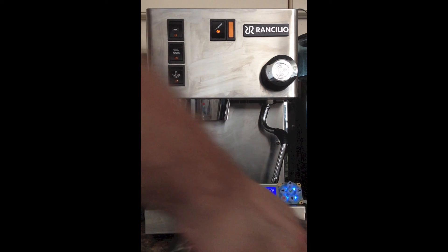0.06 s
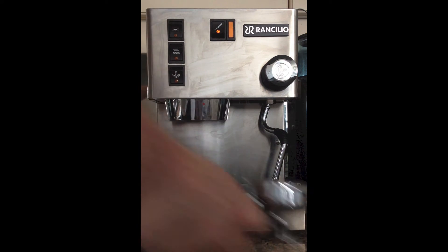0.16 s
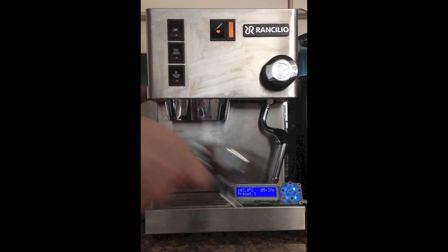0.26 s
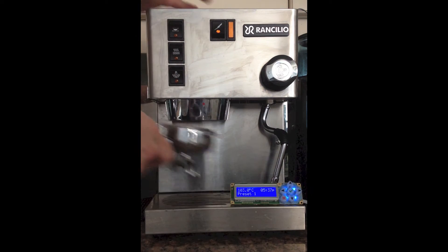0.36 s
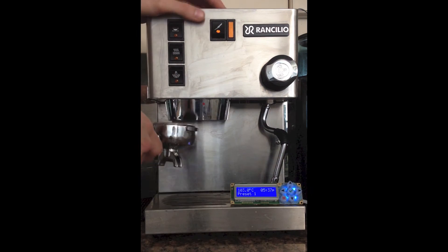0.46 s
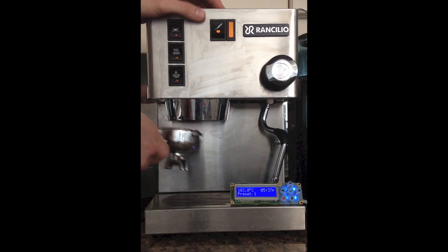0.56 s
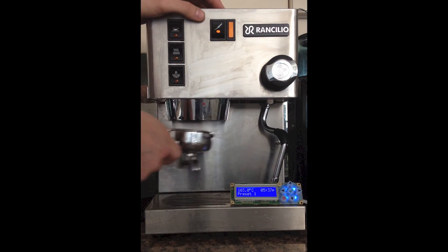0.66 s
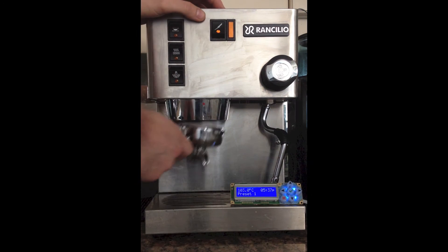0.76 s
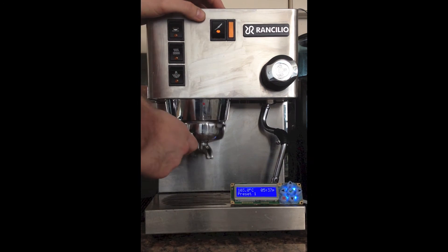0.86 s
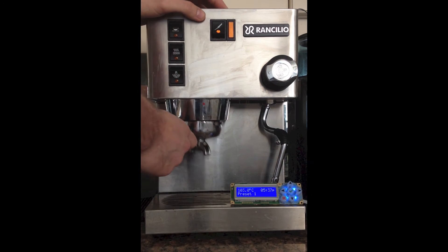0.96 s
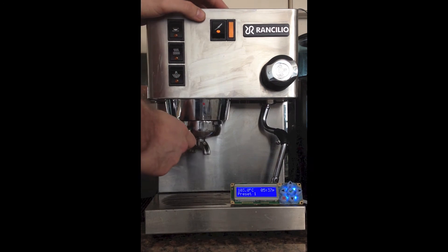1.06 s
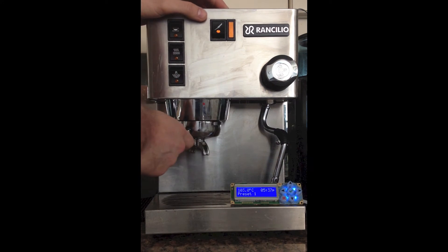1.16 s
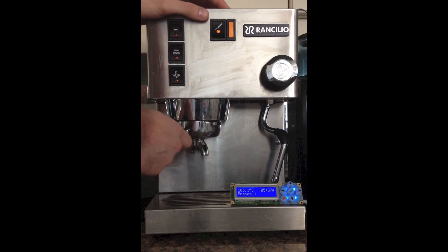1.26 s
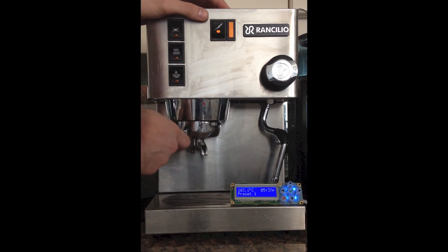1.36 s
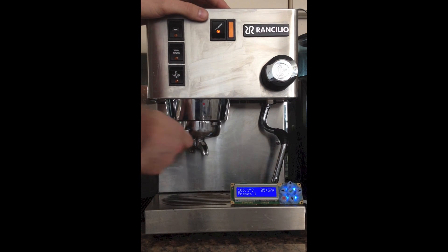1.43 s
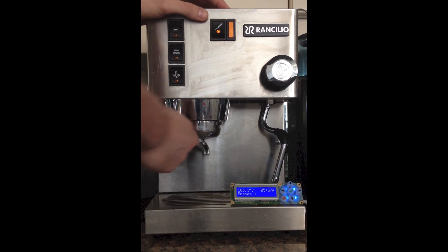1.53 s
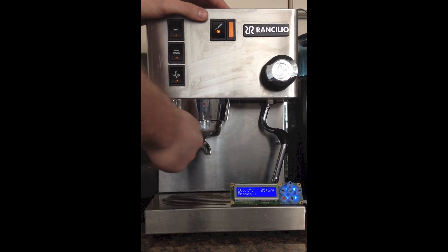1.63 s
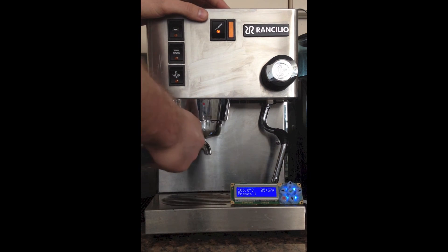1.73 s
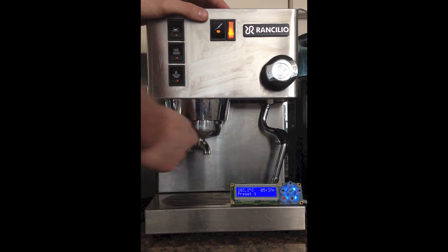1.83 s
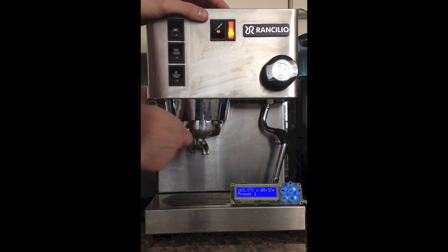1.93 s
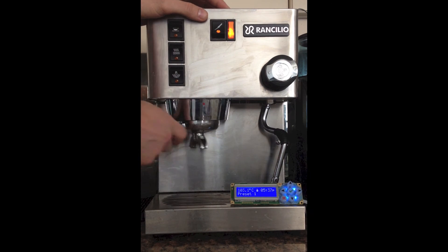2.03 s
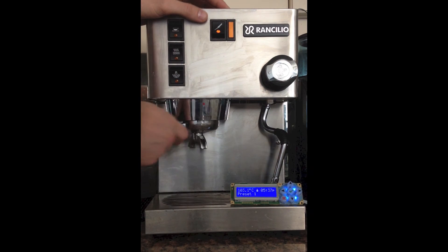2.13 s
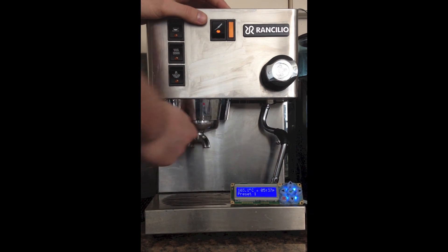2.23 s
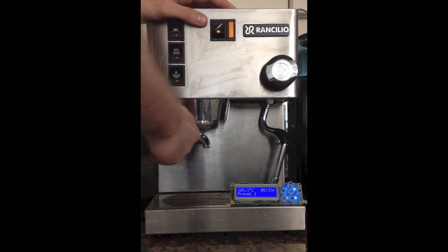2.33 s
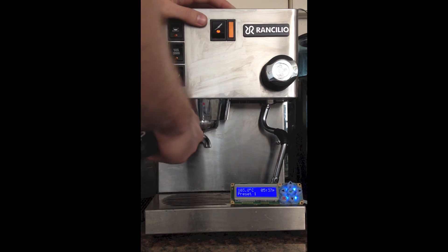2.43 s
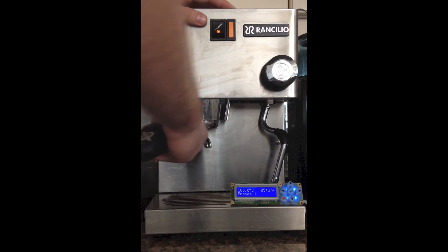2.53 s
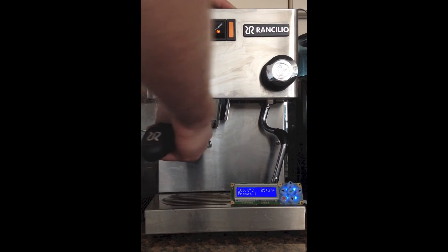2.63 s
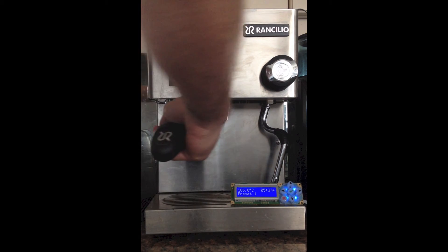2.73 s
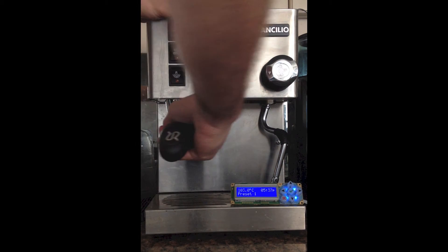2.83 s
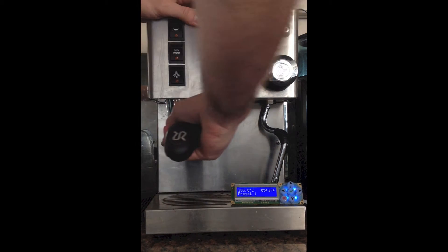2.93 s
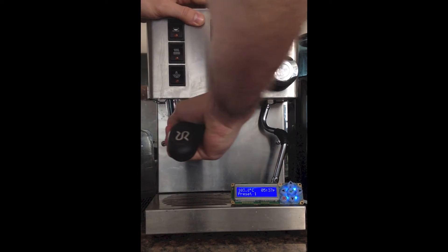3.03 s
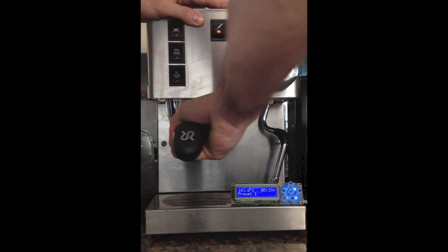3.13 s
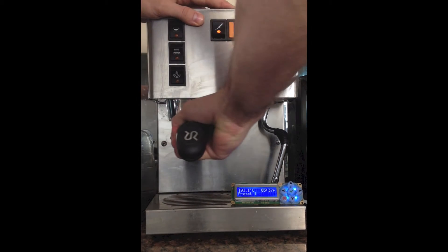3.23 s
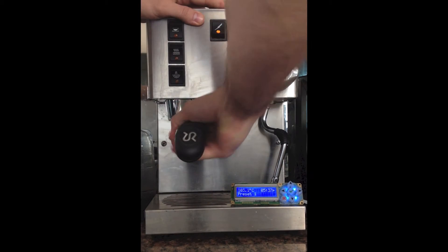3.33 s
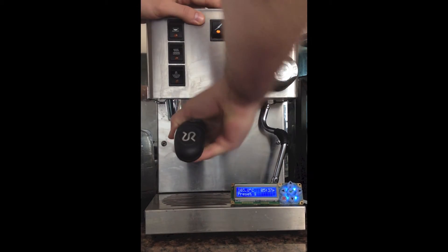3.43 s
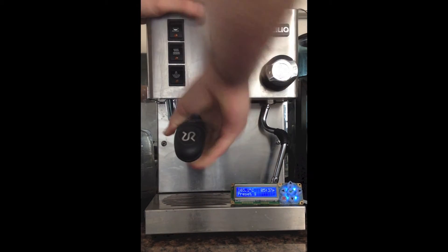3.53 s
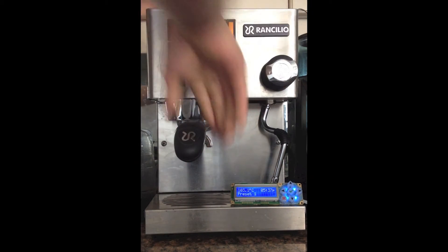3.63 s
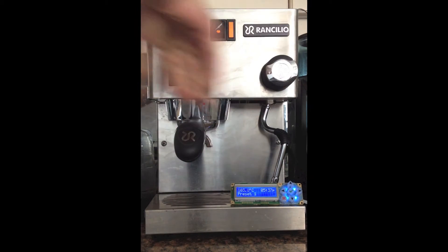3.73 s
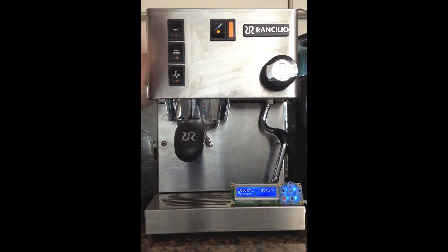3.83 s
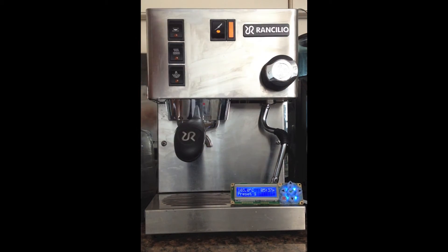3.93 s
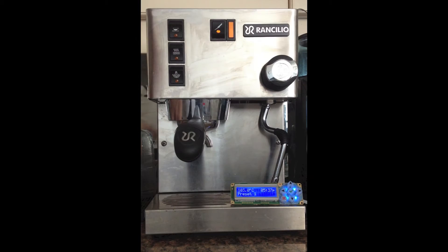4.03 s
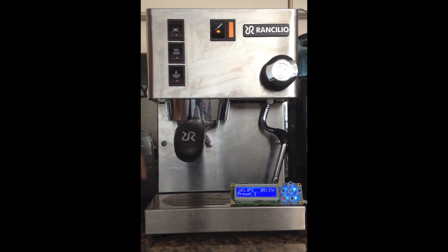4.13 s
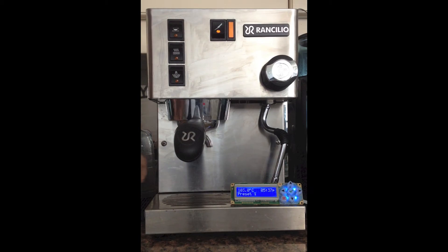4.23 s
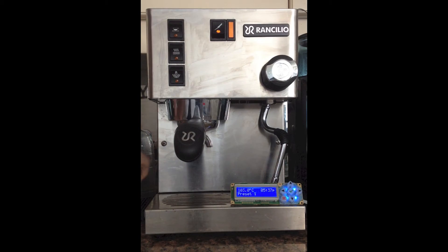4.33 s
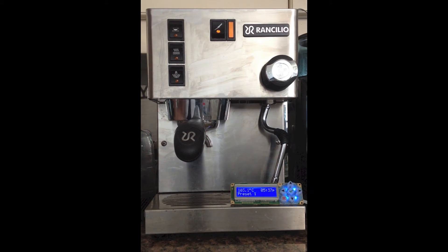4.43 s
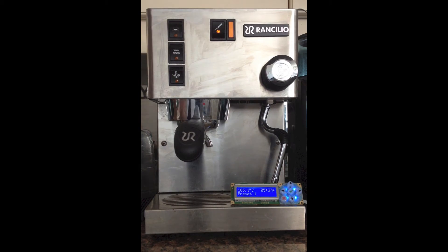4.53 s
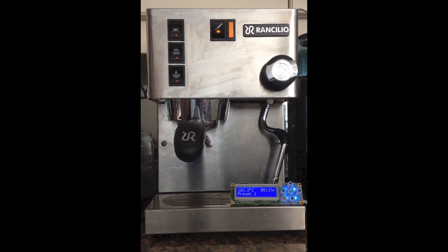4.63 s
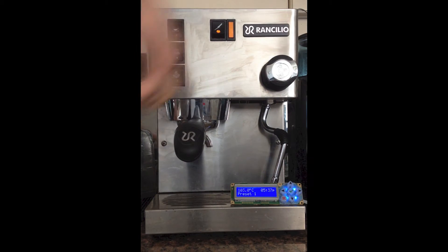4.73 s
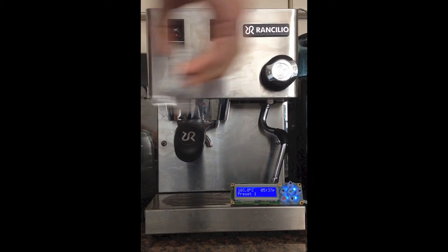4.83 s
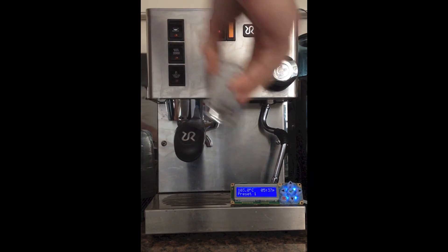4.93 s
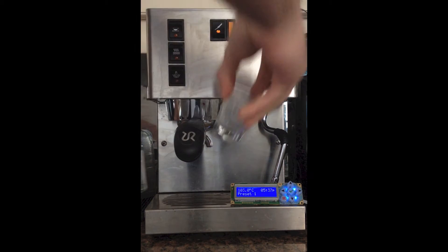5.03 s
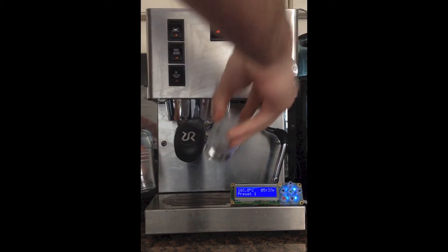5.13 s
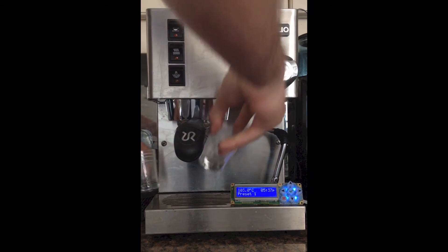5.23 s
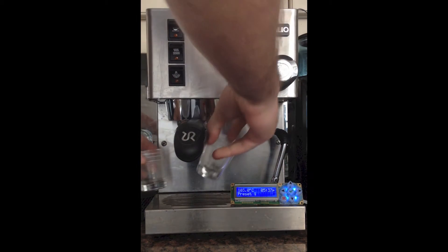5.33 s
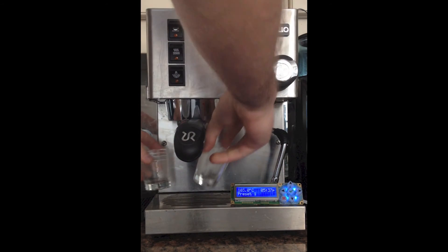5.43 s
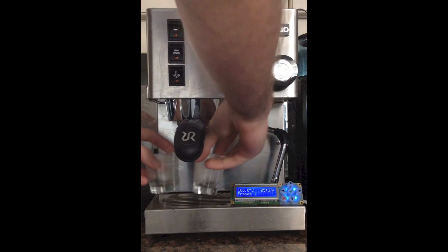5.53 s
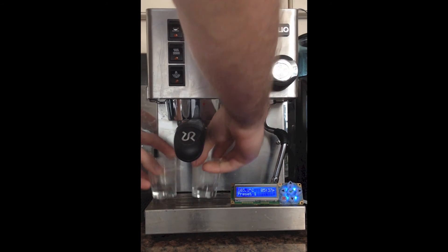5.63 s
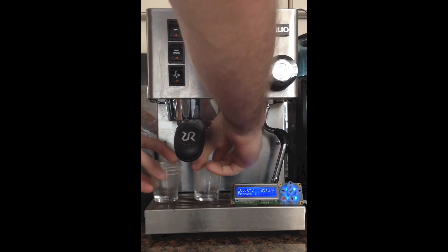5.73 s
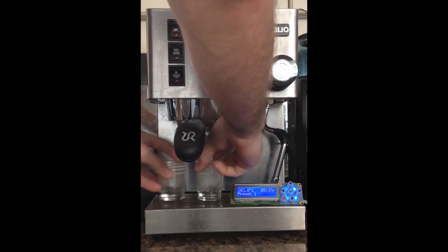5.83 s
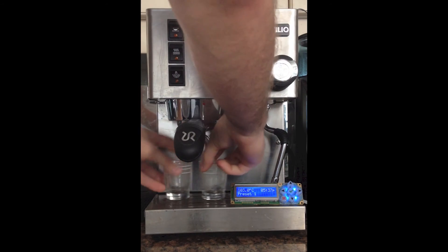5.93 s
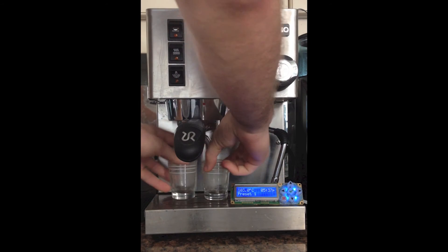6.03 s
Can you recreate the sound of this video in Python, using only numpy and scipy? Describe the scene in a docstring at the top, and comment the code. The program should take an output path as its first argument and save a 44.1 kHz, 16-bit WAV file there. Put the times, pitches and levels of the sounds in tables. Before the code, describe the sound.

A low, noisy hum with faint hiss runs throughout a reflective kitchen, heard close through a small microphone with thin bass. At 0 s a loose metal basket rings around a mid pitch and dies within a quarter second; a light metal tap follows at 0.47. From 0.82 to 1.02 a heavy metal holder knocks and scrapes against a steel housing, ringing briefly. Small taps and a short slide come at 1.46 to 1.63, a faint scrape near 1.8. The loudest clanks and a rough grating slide fall at 1.97 to 2.2. At 3.3 there is a dull thud with a quick, falling rubbery squeak that trails into a weak whine. Faint touches follow at 3.6 to 4.4, and barely audible squeaky rubs at 4.9 and 5.1. At 5.73 glass hits the steel tray with a bright, rapid clatter and ring, then soft nudges and small clinks until about 6.03.

```python
"""Portafilter and glasses

A portafilter is knocked into the group head of an espresso machine, seated and twisted until it squeaks
tight; then glasses land on the steel drip tray. A low hum fills the hard-walled kitchen.
Blows ring tuned modes and shaped noise, slides are trains of tiny slips, squeaks are gliding harmonics.
Basket, taps and hum are filtered noise; decaying noise gives the room."""
import sys
import numpy as np
from scipy import signal
from scipy.io import wavfile
from scipy.ndimage import uniform_filter1d

SR = 44100
rng = np.random.default_rng(int(sys.argv[2]) if len(sys.argv) > 2 else 0)


def put_to_file(sound):
    """Save the sound as 16-bit audio at rate SR, in the file named by the first command-line argument."""
    columns = np.atleast_2d(sound).T  # one column per channel
    safe = np.clip(columns, -1, 1)
    whole_steps = np.round(safe * 32767)
    wavfile.write(sys.argv[1], SR, whole_steps.astype(np.int16))


N = 268216
TIME = np.arange(N) / SR
EDGES_HZ = np.geomspace(28, 17000, 27)
CENTRES_HZ = np.sqrt(EDGES_HZ[1:] * EDGES_HZ[:-1])


def from_db(db):
    """Decibels to gain."""
    return 10 ** (np.asarray(db) / 20)


def rms_one(x):
    """Scale to rms 1."""
    return x / np.sqrt(np.mean(x ** 2) + 1e-20)


def at_hz(points, hz):
    """Read a table on a log-frequency axis."""
    points = np.array(points)
    return np.interp(np.log(hz), np.log(points[:, 0]), points[:, 1])


def band_pass(x, edges_hz):
    """Keep what lies between two frequencies."""
    return signal.sosfilt(signal.butter(2, edges_hz, "band", fs=SR, output="sos"), x)


def split(sources):
    """Bands of about a third octave, each rms 1, dealt in turn from two sources."""
    return [rms_one(band_pass(sources[k % 2], EDGES_HZ[k:k + 2])) for k in range(len(CENTRES_HZ))]


def shares(spectrum):
    """Band gains of a spectrum, with total power 1."""
    gains = from_db(at_hz(spectrum, CENTRES_HZ)) * np.sqrt(np.diff(EDGES_HZ))
    return gains / np.linalg.norm(gains)


def tone_db(hz, bass_db, treble_db_per_oct):
    """Heavy contacts lift the bass; hardness tilts the treble."""
    bass = bass_db / (1 + (hz / 550) ** 4)
    treble = treble_db_per_oct * np.log2(1 + (hz / 1700) ** 2) / 2
    return bass + treble


def narrow_noise(hz, width_hz):
    """Noise through one resonance, rms 1."""
    edges_hz = hz * np.exp(np.array([-.5, .5]) * width_hz / hz)
    settled = band_pass(rng.standard_normal(SR + N), edges_hz)[SR:]
    return rms_one(settled)


def dying(start_s, level_db, t60_s):
    """A sudden start and an exponential decay, floored 120 dB down."""
    return (TIME >= start_s) * from_db(level_db - 60 * np.clip((TIME - start_s) / t60_s, 0, 2))


def stroke(start_s, length_s, attack_s, release_t60_s):
    """Pressure builds, holds until the end of the stroke and is let go."""
    rise = np.clip((TIME - start_s) / attack_s, 0, 1) ** 2
    release_db = -60 * np.clip((TIME - start_s - length_s) / release_t60_s, 0, 3)
    return rise * from_db(release_db)


def clicks(times_s, heights):
    """One impulse for each contact."""
    out = np.full(N, 1e-18)
    places = np.clip(np.round(np.asarray(times_s) * SR).astype(int), 0, N - 1)
    np.add.at(out, places, heights)
    return out


def with_rebounds(rows, gap_s, loss_db, bass_gain_db):
    """Columns of all contacts: each blow, then its evenly spaced, ever weaker rebounds."""
    contacts = []
    for start_s, level_db, bass_db, *colour, rebounds in rows:
        for k in range(1 + max(round(rebounds), 0)):
            contacts.append((start_s + k * gap_s, level_db - k * loss_db, bass_db + k * bass_gain_db, *colour))
    return np.transpose(contacts)


def ring(force, hz, t60_s):
    """A unit click rings a decaying cosine; the difference of force keeps slow motion quiet."""
    r = from_db(-60 / (t60_s * SR))
    w = 2 * np.pi * hz / SR
    return signal.lfilter([1, -1], [1, -2 * r * np.cos(w), r * r], force)


def strike(times_s, level_db, treble_db_per_oct, modes, spread_db):
    """Each blow excites every mode by a chance amount; its treble tilt favours or spares the high ones."""
    chance_db = spread_db * rng.standard_normal((len(times_s), len(modes)))
    out = np.zeros(N)
    for k, (hz, mode_db, t60_s) in enumerate(modes):
        heights = from_db(level_db + mode_db + tone_db(hz, 0, treble_db_per_oct) + chance_db[:, k])
        out += (-1) ** k * ring(clicks(times_s, heights), hz, t60_s)
    return out


def overtones(low_hz, high_hz, level_db, slope_db_per_oct, t60_s, count):
    """The many higher modes of a steel sheet, scattered in pitch, with levels on a slope."""
    place = (np.arange(count) + rng.random(count)) / count
    modes_hz = low_hz * (high_hz / low_hz) ** place
    return [(hz, level_db + slope_db_per_oct * np.log2(hz / low_hz), t60_s) for hz in modes_hz]


def clatter(times_s, level_db, bass_db, treble_db_per_oct, spectrum, decay):
    """Crowded modes merge into a crash of noise that dies away band by band."""
    out = np.zeros(N)
    bands = split(rng.standard_normal((2, N)))
    for hz, gain, band in zip(CENTRES_HZ, shares(spectrum), bands):
        energy = clicks(times_s, from_db(level_db + tone_db(hz, bass_db, treble_db_per_oct)) ** 2)
        keep = from_db(-120 / (at_hz(decay, hz) * SR))  # 120: this is energy
        out += gain * band * np.sqrt(signal.lfilter([1], [1, -keep], energy))
    return out


def rubbing(rows, attack_s, release_t60_s, rest_db, rest_tone_db):
    """Level and tone of a series of strokes at every sample; the strongest stroke dominates the tone."""
    powers, tones_db = [from_db(rest_db) ** 2], [rest_tone_db]
    for start_s, length_s, level_db, stroke_tone_db in rows:
        powers.append((from_db(level_db) * stroke(start_s, length_s, attack_s, release_t60_s)) ** 2)
        tones_db.append(stroke_tone_db)
    total = sum(powers)
    return 10 * np.log10(total), sum(power * tone for power, tone in zip(powers, tones_db)) / total


def scrape(level_db, bass_db, treble_db_per_oct, spectrum, slips_per_s, uneven_db):
    """Tiny slips of uneven size, each a short burst through the body's colour."""
    sizes = from_db(uneven_db * np.minimum(rng.exponential(1, N), 4))
    slips = (rng.random(N) < slips_per_s / SR) * sizes
    keep = np.exp(-1 / (0.0078 * SR))  # energy time constant 7.8 ms
    grip = np.sqrt(signal.lfilter([1], [1, -keep], slips ** 2 + 1e-18))
    bands = split(grip * rng.standard_normal((2, N)))
    out = np.zeros(N)
    for hz, gain, band in zip(CENTRES_HZ, shares(spectrum), bands):
        out += gain * band * from_db(level_db + tone_db(hz, bass_db, treble_db_per_oct))
    return out


# Spectrum of the hum. Each row: frequency in Hz, relative density in dB per Hz.
HUM_SPECTRUM = [(18, -85), (30, -59), (64, -14.5), (102, -13), (126, -2), (152, -2), (270, 1), (324, -20.5),
                (359, -9.5), (389, -10.5), (639, -17), (1550, -38), (1870, -31.5), (2690, -34.5),
                (15500, -45)]
# Resonances in the hum. Each row: frequency in Hz, width in Hz, level in dB.
HUM_RESONANCES = [(154.8, 16.8, -59.5), (184, 8.2, -65), (216.4, 4, -66.5), (268, 17, -65.5),
                  (361.6, 3.5, -72)]


def hum():
    """Low, noisy hum with a few wavering resonances and a faint hiss above it."""
    bands = split(rng.standard_normal((2, N)))
    bed = sum(gain * band for gain, band in zip(shares(HUM_SPECTRUM), bands))
    peaks = sum(from_db(level_db) * narrow_noise(hz, width_hz) for hz, width_hz, level_db in HUM_RESONANCES)
    return from_db(-56) * bed + peaks + hiss(level_db=-79.5, low_hz=12800)


def hiss(level_db, low_hz):
    """Faint high-passed noise at the very top."""
    high_pass = signal.butter(2, low_hz, "high", fs=SR, output="sos")
    return from_db(level_db) * rms_one(signal.sosfilt(high_pass, rng.standard_normal(N)))


# Basket resonances. Each row: frequency in Hz, width in Hz, level in dB, t60 in s.
BASKET_RESONANCES = [(697, 31.6, -30.5, 0.22), (570, 470, -39, 0.27), (926, 280, -57, 0.16),
                     (1086, 64, -47.5, 0.22), (1410, 200, -50, 0.14), (1790, 170, -56, 0.15),
                     (5200, 1100, -52, 0.18), (7460, 200, -55.5, 0.24), (11440, 350, -68, 0.25),
                     (14500, 700, -61, 0.16)]


def basket():
    """The loose filter basket rings roughly as the portafilter is lifted: narrow noises dying from time 0."""
    return sum(narrow_noise(hz, width_hz) * dying(0, level_db, t60_s)
               for hz, width_hz, level_db, t60_s in BASKET_RESONANCES)


# Taps, thuds and pings of handle, lugs and glass.
# Each row: start in s, level in dB, centre in Hz, width in octaves, t60 in s.
TOUCHES = [(.469, -48.5, 1343, 0.12, 0.098), (0.468, -58, 2140, 0.52, 0.16), (1.464, -51, 980, 0.45, 0.064),
           (1.609, -48.5, 2130, 0.05, 0.16), (3.2367, -58.5, 2380, 0.27, 0.037),
           (3.311, -37, 404, 0.73, 0.14), (3.308, -40.5, 730, 0.43, 0.17), (3.632, -67, 2980, 2.6, 0.1),
           (3.704, -63, 4050, 2.1, 0.12), (4.2877, -68.5, 2500, 2.4, 0.12),
           (4.366, -63.5, 3700, 0.23, 0.055), (5.892, -52, 2090, 0.074, 0.18),
           (5.891, -55, 4500, 0.11, 0.23), (5.935, -73, 2920, .15, 0.18), (5.944, -50.5, 429, 0.14, 0.53)]


def taps():
    """Small touches, each a dying narrow noise in its own register."""
    return sum(narrow_noise(hz, hz * octaves * np.log(2)) * dying(start_s, level_db, t60_s)
               for start_s, level_db, hz, octaves, t60_s in TOUCHES)


# Portafilter against group head. Each row: start in s, relative level in dB, bass in dB,
# treble in dB per octave, housing ring in dB, portafilter ring in dB, rebounds as a count.
KNOCK_BLOWS = [(.8195, -25, -25, 2.5, -6.5, -0.5, 0), (.8395, -26, 5.5, 3, 3, -27, 0),
               (.9065, -29.5, -17, 0.5, -15, -4, 0), (.911, -17.5, -16, -8, -8.5, 2, 0),
               (.977, -13, -1, 1, -3.5, -1, 1), (1.018, -25.5, 4, -7, -15, 11, 0),
               (1.607, -32.5, 7, 0, -1.5, -16, 0), (1.9735, -34, -2, -6, -6, -8, 0),
               (1.980, -12, -27, -2.5, -16, -2, 0), (2.009, -18, -6, 2.5, -22, -32, 0),
               (2.013, -22.5, 5, 3, 1, 11.5, 1), (2.048, -19.5, 2, -1.5, -3.5, -17, 0),
               (2.165, -15.5, -1.5, -1.5, -4, -17, 0), (2.187, -11.5, -45, -11, -21, -20, 0),
               (3.31, -38, -18, 3.5, 1.5, -18, 0)]
# Modes of housing and portafilter. Each row: frequency in Hz, relative level in dB, t60 in s.
HOUSING_MODES = [(193, -16, .6), (249, -13, .7), (307, -10, .7), (352, -12, .5), (378, -10.5, 1.0),
                 (420, -10, .8), (440, -6, .35), (472, -7, .2), (553, -10, .3), (592, -9, .6),
                 (651, -12, .4), (732, -15, .26), (819, -11, .6), (851, -17, .45), (910, -16, .8),
                 (1055, -14, .8), (1088, -10, .35), (1244, -15, .4), (1343, -12, .4), (1376, -18, .6),
                 (1493, -13, .4), (1557, -18, .45), (1891, -18, .4), (1949, -21, .4), (2010, -19, .4),
                 (2191, -17, .45), (2331, -21, .55), (2525, -21, .55), (2900, -20, .4), (4522, -20, .35)]
HOLDER_MODES = [(820, 1, .17), (1005, -12, .15), (1157, -10, .18), (1374, -13, .22), (2649, -17, .22),
                (3463, -20, .2), (3900, -20, .1)]
# Crash and slide spectrum. Each row: frequency in Hz, relative density in dB per Hz.
STEEL_SPECTRUM = [(40, -42), (90, -45.5), (160, -10.5), (300, 2.5), (480, 6.5), (700, -3), (1000, -1),
                  (1600, -9), (2800, -12.5), (4400, -15), (5500, -19.5), (8000, -23.5), (10500, -42),
                  (15000, -39.5)]
# Crash decay. Each row: frequency in Hz, t60 in s.
STEEL_T60 = [(100, 0.32), (400, 0.08), (1000, 0.17), (3000, 0.14), (8000, 0.046), (15000, 0.3)]
# Metal sliding in the group head. Each row: start in s, length in s, level in dB, treble in dB per octave.
SLIDE_STROKES = [(.9, 0.15, -40.5, -0.5), (.97, 0.066, -37, 3.5), (1.08, 0.19, -56, 3.5),
                 (1.48, 0.1, -57, -4), (1.63, 0.028, -43, -7), (1.775, 0.12, -51.5, -3.5),
                 (1.93, .04, -54.5, -3.5), (1.98, 0.097, -28, 0.5), (2.185, 0.022, -42.5, 7.5),
                 (2.25, 0.089, -58, 5), (2.45, 0.18, -60, -1.5), (3.35, 0.083, -59.5, 6),
                 (3.56, 0.095, -63.5, 4)]
CRASH_DB, HOUSING_DB, HOLDER_DB = -3, -11, -13


def portafilter():
    """Knocks ring the heavy brass holder and the steel housing; lugs slide over a faint steady rustle."""
    start_s, level_db, bass_db, treble_db, housing_db, holder_db = with_rebounds(
        KNOCK_BLOWS, gap_s=.0061, loss_db=10.5, bass_gain_db=1)
    crash = clatter(start_s, level_db, bass_db, treble_db, STEEL_SPECTRUM, STEEL_T60)
    panels = HOUSING_MODES + overtones(
        low_hz=1423, high_hz=8980, level_db=-17.5, slope_db_per_oct=-5.5, t60_s=0.3, count=30)
    housing = strike(start_s, level_db + housing_db, treble_db, panels, spread_db=1.0)
    holder = strike(start_s, level_db + holder_db, treble_db, HOLDER_MODES, spread_db=5.5)
    slide_db, slide_treble_db = rubbing(
        SLIDE_STROKES, attack_s=0.026, release_t60_s=0.16, rest_db=-68.5, rest_tone_db=3)
    lugs = scrape(slide_db, 3.7, slide_treble_db, STEEL_SPECTRUM, slips_per_s=500, uneven_db=2.5)
    return from_db(CRASH_DB) * crash + from_db(HOUSING_DB) * housing + from_db(HOLDER_DB) * holder + lugs


# The gasket slips twice, creeps tight and whines; later a finger rubs twice on a glass.
# Each row: start in s, length in s, release t60 in s, level in dB, pitch in Hz, glide in Hz per s,
# pitch jitter as a share, brightness in dB per octave.
SQUEAK_STROKES = [(3.3, 0.015, 0.052, -29.5, 2069, -1200, .018, -2),
                  (3.323, .011, 0.061, -33, 2070, -1800, 0.023, 0.5),
                  (3.34, 0.032, 0.31, -48.5, 2040, -200, .032, -1.5),
                  (3.386, 0.055, 0.65, -58, 1580, -110, 0.0038, -27),
                  (4.91, 0.077, 0.37, -70.5, 1830, 2, 0.063, -18),
                  (5.07, 0.052, .7, -72.5, 2030, 1196, 0.065, -20)]
# Each row: multiple of the pitch, relative level in dB before brightness.
HARMONICS = [(1, 2.5), (2, -2), (3, -12.5), (4, -17), (5, -26), (6, -27), (7, -26)]


def squeak(start_s, length_s, release_t60_s, level_db, hz, glide_hz_per_s, jitter, bright_db_per_oct):
    """Rubber or skin sticks and slips at an unsteady, gliding pitch; sharper slips are richer in harmonics."""
    waver = rms_one(uniform_filter1d(rng.standard_normal(N), size=130))
    pitch_hz = hz + glide_hz_per_s * np.clip(TIME - start_s, 0, length_s + release_t60_s)
    phase = 2 * np.pi * np.cumsum(pitch_hz * (1 + jitter * waver)) / SR
    tone = np.zeros(N)
    for k, harmonic_db in HARMONICS:
        tone += from_db(harmonic_db + bright_db_per_oct * np.log2(k)) * np.sin(round(k) * phase)
    pressure = stroke(start_s, length_s, 0.013, release_t60_s)
    return from_db(level_db) * pressure * rms_one(tone)


# Glass on the drip tray. Each row: start in s, level in dB, bass in dB, treble in dB per octave,
# relative ring in dB, rebounds as a count (rounded, none below 0).
GLASS_LANDINGS = [(5.7348, -22.5, -9, -1.5, 0, 3.5), (5.890, -50, -2, 3, -2, 0),
                  (5.968, -55.5, 16, 1, -6, 1), (6.0147, -60.5, 7, 4, 0, -1),
                  (6.028, -59, 0, 4.5, -5, -1.5)]
# Modes of the tray. Each row: frequency in Hz, relative level in dB, t60 in s.
TRAY_MODES = [(281, -5, 0.42), (442, -9, 1), (569.5, -11, 0.34), (851, -18, 0.21), (1090, -19, 0.28),
              (1730, -6.5, 0.29), (1850, -21, .24), (2120, -20, .26), (2460, -15, .2), (2660, -20, 0.16),
              (2800, -20, 0.37), (2970, -11, .4), (3463, -5, 0.5), (4021, -12, 0.38), (6600, -24, .2),
              (8070, -12, .2)]
# Crash and nudge spectrum. Each row: frequency in Hz, relative density in dB per Hz.
GLASS_SPECTRUM = [(40, -62), (120, -11.5), (300, 5.5), (700, 1), (1200, -4), (1900, -0.5), (2700, 4.5),
                  (3500, 0), (5000, -3.5), (8000, -4), (10500, -20), (15000, -14)]
# Crash decay. Each row: frequency in Hz, t60 in s.
GLASS_T60 = [(100, 0.97), (400, 0.049), (1000, 0.22), (3000, 0.075), (8000, 0.088), (15000, 0.073)]
# Glasses pushed over the tray. Each row: start in s, length in s, level in dB, bass in dB.
SHUFFLE_STROKES = [(5.762, 0.018, -31, -7), (5.81, 0.14, -54.5, 11), (5.93, 0.044, -59, -6)]
TRAY_DB = -12


def glasses():
    """Glass bases land rim by rim on the tray, ringing it, and are nudged into place."""
    # rebounds get heavier as more of the base comes down
    start_s, level_db, bass_db, treble_db, ring_db = with_rebounds(
        GLASS_LANDINGS, gap_s=0.0051, loss_db=3.7, bass_gain_db=3.5)
    crash = clatter(start_s, level_db, bass_db, treble_db, GLASS_SPECTRUM, GLASS_T60)
    sheet = TRAY_MODES + overtones(
        low_hz=2260, high_hz=12000, level_db=-18, slope_db_per_oct=1, t60_s=0.13, count=20)
    tray = from_db(TRAY_DB) * strike(start_s, level_db + ring_db, treble_db, sheet, spread_db=2)
    shuffle_db, shuffle_bass_db = rubbing(
        SHUFFLE_STROKES, attack_s=0.0081, release_t60_s=0.19, rest_db=-100, rest_tone_db=0)
    nudges = scrape(shuffle_db, shuffle_bass_db, -4.5, GLASS_SPECTRUM, slips_per_s=300, uneven_db=1.5)
    return crash + tray + nudges


# Decay of the room. Each row: frequency in Hz, t60 in s.
ROOM_T60 = [(100, 1), (400, 0.56), (1000, 0.55), (3000, 0.6), (8000, 0.62), (15000, 0.94)]
ROOM_DB, ROOM_BUILD_S = -10, 0.0017


def kitchen(x):
    """Diffuse reflections off hard walls build up and die away, each band at its own rate."""
    t = TIME[:SR]
    bands = split(rng.standard_normal((2, SR)))
    weights = np.sqrt(np.diff(EDGES_HZ) / (SR / 2))
    tail = np.zeros(SR)
    for hz, weight, band in zip(CENTRES_HZ, weights, bands):
        tail += weight * band * from_db(-60 * t / at_hz(ROOM_T60, hz))
    tail *= 1 - np.exp(-(t / ROOM_BUILD_S) ** 2)
    return from_db(ROOM_DB) * signal.fftconvolve(x, tail / np.linalg.norm(tail))[:N]


def scene():
    """All the handling, its reflections and the hum."""
    squeaks = sum(squeak(*row) for row in SQUEAK_STROKES)
    handling = basket() + taps() + portafilter() + squeaks + glasses()
    return (handling + kitchen(handling) + hum())[None]


MIC_LOW_CUT_HZ, CUTOFF_HZ = 107, 15600


def record(dry):
    """A small microphone thins the bass; the top is cut steeply."""
    thin = signal.sosfilt(signal.butter(2, MIC_LOW_CUT_HZ, "high", fs=SR, output="sos"), dry)
    return signal.sosfilt(signal.ellip(12, .1, 80, CUTOFF_HZ, fs=SR, output="sos"), thin)


dry = scene()
out = record(dry)
put_to_file(out)
```